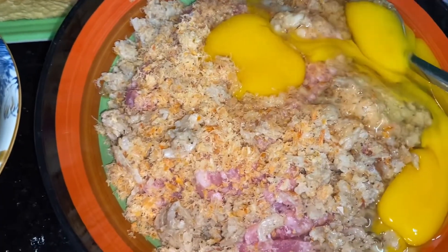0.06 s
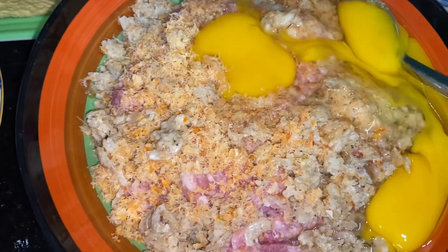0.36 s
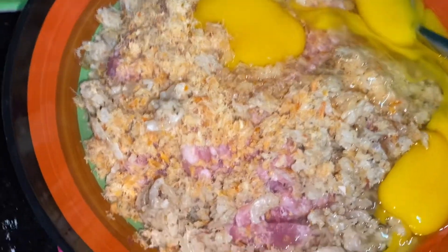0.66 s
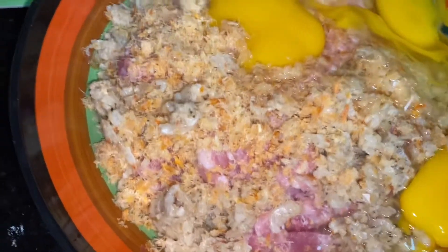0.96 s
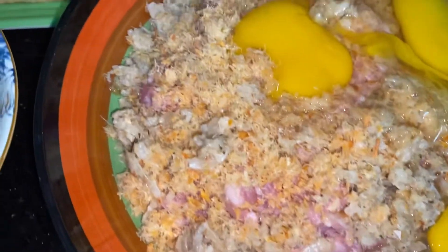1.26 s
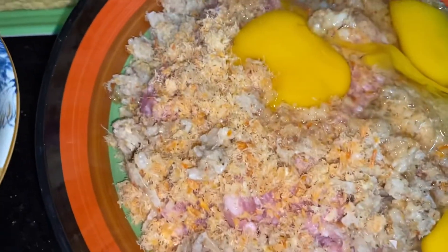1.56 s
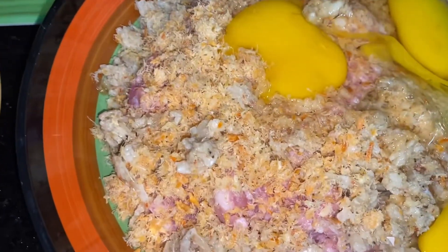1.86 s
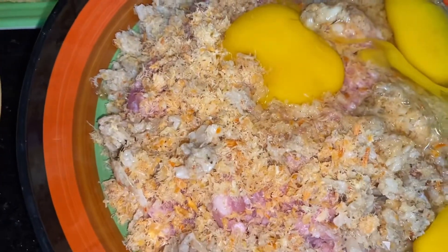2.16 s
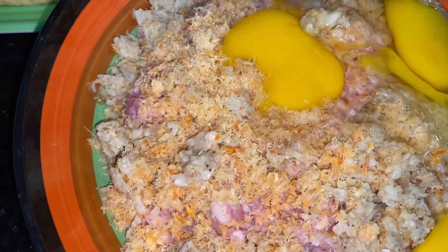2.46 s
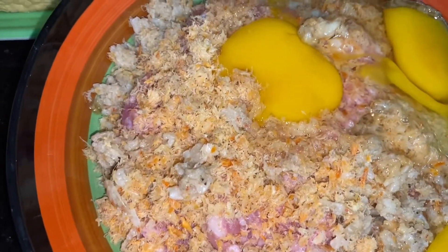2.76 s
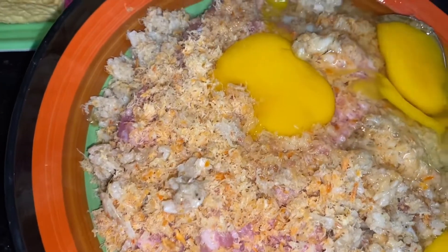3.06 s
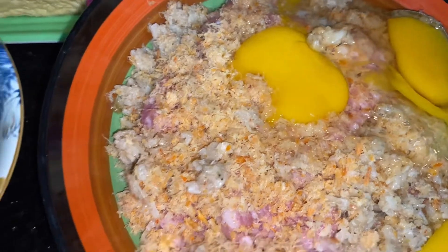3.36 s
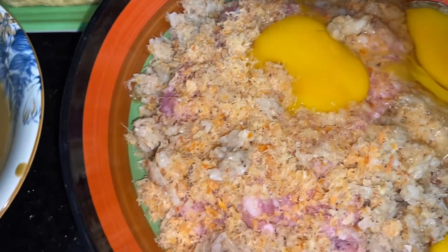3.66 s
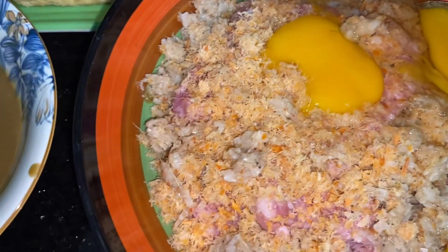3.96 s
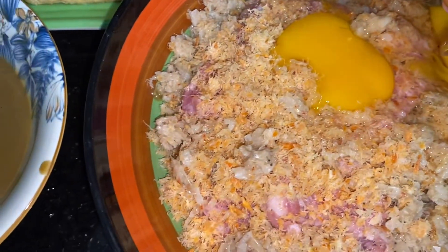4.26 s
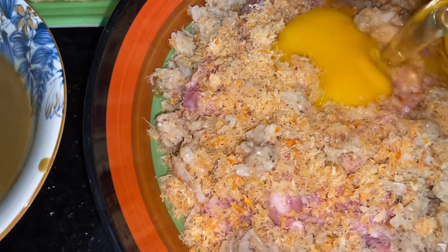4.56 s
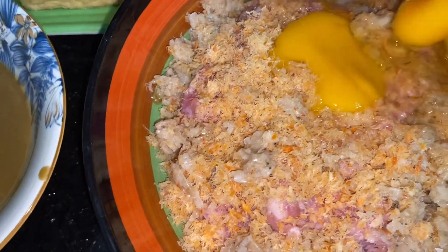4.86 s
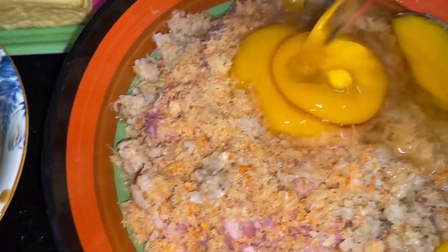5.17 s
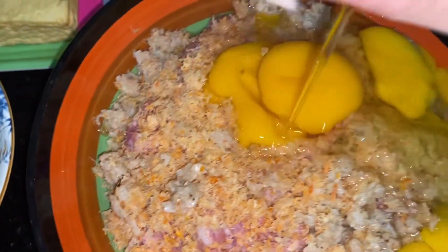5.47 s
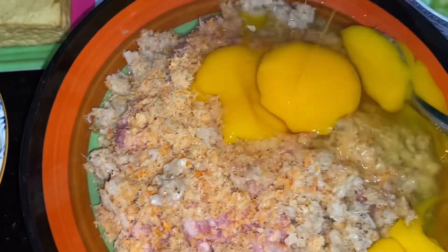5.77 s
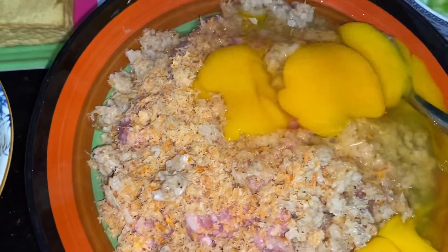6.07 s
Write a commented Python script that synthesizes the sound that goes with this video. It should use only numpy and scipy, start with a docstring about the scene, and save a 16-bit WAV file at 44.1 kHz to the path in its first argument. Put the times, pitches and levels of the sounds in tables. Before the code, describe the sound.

Eggs tap and crack against a china bowl with a ringing clink, then the shell crackles as it is pried open.

```python
"""Cracking eggs in a small kitchen

Eggs are cracked close by, over a dish of minced meat. Things knock and bounce on the counter in
heavily damped impacts. An egg taps a china bowl and breaks on its rim, exciting the modes of the
bowl and of a neighbouring dish. Thumbs pry the shell open in many brittle fractures that ring its
hollow. The walls return a diffuse reverberation, over room air and a low appliance hum."""
import sys
import numpy as np
from scipy import signal
from scipy.fft import rfft, irfft, next_fast_len
from scipy.io import wavfile
from scipy.ndimage import uniform_filter1d

SR = 44100
rng = np.random.default_rng(int(sys.argv[2]) if len(sys.argv) > 2 else 0)


def materialize(psi):
    """Save the field psi as 16-bit PCM at rate SR to the path in sys.argv[1].

    A 1-D psi becomes a single channel; in a 2-D psi each row is a channel.
    """
    bounded = np.clip(np.atleast_2d(psi).T, -1, 1)
    quanta = np.round(bounded * 32767).astype(np.int16)
    wavfile.write(sys.argv[1], SR, quanta)


N = 274302
TOP_HZ = 16000  # upper band limit


def amp(db):
    """Amplitude ratio of a level in decibels."""
    return 10 ** (np.asarray(db) / 20)


def unit(x):
    """Normalisation to unit RMS."""
    return x / np.sqrt(np.mean(x ** 2) + 1e-20)


def with_energy(x, envelope):
    """Normalisation to the energy of the envelope."""
    return x * np.linalg.norm(envelope) / np.linalg.norm(x)


def at_time(curve, s):
    """Linear interpolation of (time, value) points."""
    return np.interp(s, *np.transpose(curve))


def at_hz(curve, hz):
    """Interpolation of (frequency, value) points on a logarithmic axis."""
    freqs, values = np.transpose(curve)
    return np.interp(np.log(hz + 1), np.log(freqs + 1), values)


def fade(t, t60):
    """Exponential decay, 60 dB down after t60."""
    return np.exp(-np.log(1000) * t / t60)


def rise(t, tau):
    """Exponential approach to 1 with time constant tau."""
    return 1 - np.exp(-t / tau)


def add(track, s, sound):
    """Superposition of a sound on the track at s seconds."""
    part = track[round(s * SR):][:len(sound)]
    part += sound[:len(part)]


def filtered(x, response):
    """Filtering by multiplication with a complex frequency response."""
    n = x.shape[-1]
    padded = next_fast_len(n + SR // 10)
    return irfft(rfft(x, padded) * response(np.fft.rfftfreq(padded, 1 / SR)), padded)[..., :n]


def band(x, low_hz, high_hz, order=2):
    """Causal band-pass: a high-pass and a low-pass in cascade."""
    edge = lambda hz, kind: signal.butter(order, min(hz, SR / 2 - 1), kind, fs=SR, output="sos")
    return signal.sosfilt(np.vstack([edge(low_hz, "high"), edge(high_hz, "low")]), x)


def coloured(x, spectrum, size=1024):
    """Minimum-phase filtering: folding the cepstrum makes the response causal."""
    cepstrum = irfft(np.log(amp(at_hz(spectrum, np.fft.rfftfreq(size, 1 / SR)))))
    fold = np.r_[1, np.full(size // 2 - 1, 2), np.zeros(size // 2)]
    impulse_response = irfft(np.exp(rfft(cepstrum * fold)))
    return signal.fftconvolve(x, impulse_response)[:len(x)]


def resonance(x, hz, q):
    """Forced response of a damped resonator."""
    return signal.lfilter(*signal.iirpeak(min(hz, SR / 3), q, fs=SR), x)


def ring(modes, t, blur):
    """Free decay of (Hz, dB, t60) modes; phase diffusion widens each by the fraction blur."""
    wander = lambda hz: np.cumsum(rng.standard_normal(len(t))) * np.sqrt(2 * np.pi * blur * hz / SR)
    return sum(amp(db) * fade(t, t60) * np.sin(2 * np.pi * hz * t + wander(hz)) for hz, db, t60 in modes)


def burst(envelope):
    """Many tiny contacts sum to Gaussian noise under the envelope."""
    return envelope * rng.standard_normal(len(envelope))


def clumps(t, samples, spread_db=4.5):
    """Log-normal amplitude modulation gathers noise into gritty clumps."""
    return amp(spread_db * unit(uniform_filter1d(rng.standard_normal(len(t)), size=samples)))


# Spectrum of the room air: (frequency [Hz], relative density [dB])
AIR_SPECTRUM = [(20, -44.5), (38, -11.5), (55, 5), (78, 3), (100, -3.5), (130, 3), (190, -9), (290, -7),
                (450, -13.5), (1000, -19.5), (2500, -27.5), (5000, -30.5), (11000, -34.5), (16000, -38.5)]
# Partials of the appliance hum: (frequency [Hz], level [dB])
HUM_PARTIALS = [(124, -67), (284, -60.5), (660, -75.5)]


def background():
    """Partly coherent room noise, alike on both sides in the bass, and a hum of drifting phase."""
    side_gain_db = [(120, -25.5), (600, 1.0), (3000, -11.0), (7000, -43.5)]
    mid, side = filtered(rng.standard_normal((2, N)), lambda hz: amp(at_hz(AIR_SPECTRUM, hz)))
    side = filtered(side, lambda hz: amp(at_hz(side_gain_db, hz)))
    air = amp(-53) * unit(np.array([mid + side, mid - side]))
    t = np.arange(N) / SR
    drift = lambda: 4 * np.cumsum(rng.standard_normal(N)) / np.sqrt(SR)
    return air + sum(amp(db) * np.sin(2 * np.pi * hz * t + drift()) for hz, db in HUM_PARTIALS)


def whine(start=5.55, hz=658, db=-60):
    """A lightly damped mode sets in as a faint, almost steady tone."""
    out, t = np.zeros(N), np.arange(SR) / SR
    add(out, start, rise(t, 0.0085) * ring([(hz, db, 20)], t, blur=0.0048))
    return out


# Reverberation time of the kitchen: (frequency [Hz], t60 [s])
ROOM_DECAY = [(150, 0.33), (600, 0.74), (2200, 0.77), (5000, 0.68), (10000, 0.64), (16000, 0.2)]
# Reflection from the walls: (frequency [Hz], relative level [dB])
WALL_GAIN = [(100, 1.5), (500, -6.5), (2000, -5), (3700, -1.5), (6000, -2.5), (15000, -6.5)]


def reverberation(x, blur_octaves, size, side_db=-9.5):
    """Diffuse field: the room stores each band's energy and returns it as noise with blurred peaks."""
    hz, _, spectra = signal.stft(x, SR, nperseg=size)
    octave = np.log2(hz + 1)
    blur = np.exp(-.5 * ((octave[:, None] - octave) / blur_octaves) ** 2)
    power = blur / blur.sum(axis=1, keepdims=True) @ np.abs(spectra) ** 2
    kept = fade(size / 2 / SR, at_hz(ROOM_DECAY, hz)) ** 2  # share of energy left after one hop
    stored = np.abs([signal.lfilter([0, 1 - k], [1, -k], p) for k, p in zip(kept, power)])
    noise = signal.stft(rng.standard_normal((2, N)), nperseg=size)[2]
    wash = noise / noise.std() * np.sqrt(stored) * amp(at_hz(WALL_GAIN, hz))[:, None]
    mid, side = signal.istft(wash, nperseg=size)[1][:, :N]
    return np.array([mid + amp(side_db) * side, mid - amp(side_db) * side])


def scattering(x, db=-13, t60=0.0053, segments=24):
    """Time-varying scattering from moving hands and crockery makes the two sides differ."""
    side, t = np.zeros(N), np.arange(SR // 40) / SR
    for part in np.array_split(np.arange(N), segments):
        echoes = burst(fade(t, t60))
        add(side, part[0] / SR, signal.fftconvolve(x[part], echoes / np.linalg.norm(echoes)))
    return amp(db) * np.array([side, -side])


# Deep thuds: (time [s], level [dB], frequency [Hz], rise time [s], t60 [s])
DEEP_THUDS = [(2.698, -40, 75.5, .004, 0.23), (2.978, -24, 106.5, 0.005, 0.17),
              (3.013, -23.5, 70.8, 0.004, 0.13), (5.868, -30, 53, 0.07, 0.94)]


def thuds():
    """Damped low sinusoids swell and die away as round thuds."""
    out, t = np.zeros(N), np.arange(SR) / SR
    for s, db, hz, rise_s, t60 in DEEP_THUDS:
        add(out, s, amp(db) * rise(t, rise_s) * fade(t, t60) * np.sin(2 * np.pi * hz * t))
    return out


def click_gain(db):
    """Nonlinear contact: the harder the blow, the larger the share of its bright click."""
    return amp(-26.5 + 0.09 * db)


def knock(db, low_hz, high_hz, t60):
    """A heavily damped impact, strongest between two broad resonances of the thing struck."""
    t = np.arange(SR // 4) / SR
    envelope = fade(t, t60) * rise(t, 0.00035)
    clatter = burst(envelope)
    body = band(clatter, low_hz * 0.83, high_hz, order=3) + click_gain(db) * band(clatter, 2437, 13000)
    hollow = unit(resonance(body, low_hz, q=16)) + unit(resonance(body, high_hz, q=15))
    return amp(db) * with_energy(unit(body) + amp(-15.5) * hollow, envelope)


# Dull blows: (time [s], level [dB], lower resonance [Hz], upper resonance [Hz], t60 [s],
# settling bump relative to the blow [dB])
DULL_BLOWS = [(0.3151, -12, 1555, 2530, 0.039, -11), (0.3174, -5, 710, 1850, 0.013, -21),
              (2.6923, -23.5, 313, 730, 0.096, -25.5), (2.977, -5, 1000, 1390, 0.0054, -26.5),
              (2.9814, -6.5, 1020, 1400, 0.0074, -14.5), (3.007, -15, 835, 1450, 0.05, -26),
              (3.021, -24, 147, 1250, 0.034, -3.5), (3.074, -32.5, 890, 1522, 0.066, -27.5),
              (4.008, -14.5, 271, 1190, 0.0064, -14), (4.2, -21, 272, 1470, 0.015, -11.5)]


def knocks(settle_s=0.0046, pitch_ratio=0.35, decay_ratio=1.95):
    """Rebound: after each blow the thing settles with a lower, longer bump."""
    out = np.zeros(N)
    for s, db, low_hz, high_hz, t60, settle_db in DULL_BLOWS:
        add(out, s, knock(db, low_hz, high_hz, t60))
        bump = knock(db + settle_db, low_hz * pitch_ratio, high_hz * pitch_ratio, t60 * decay_ratio)
        add(out, s + settle_s, bump)
    return out


# Fingers rubbing on shell: (time [s], duration [s], level [dB], band centre [Hz])
RUB_STROKES = [(0.207, 0.062, -37.5, 5170), (0.223, 0.11, -43, 990), (0.371, 0.0055, -34, 10500),
               (1.467, 0.081, -53, 2560), (1.541, 0.059, -43.5, 2860), (1.574, 0.04, -34, 4200),
               (1.685, 0.024, -35.5, 810), (1.886, 0.069, -55.5, 8600), (1.965, 0.067, -44.5, 1110),
               (2.115, 0.029, -51.5, 4460), (3.161, 0.012, -48.5, 6100), (4.562, 0.083, -45, 3504),
               (4.713, 0.034, -39.5, 3400), (5.244, 0.038, -38.5, 9800), (5.322, 0.014, -25.5, 11900)]


def rubs():
    """Friction noise: a gritty band that swells and stops with the stroke."""
    out, t = np.zeros(N), np.arange(SR // 5) / SR
    for s, length, db, hz in RUB_STROKES:
        stroke = np.sqrt(np.abs(np.sin(np.pi * np.minimum(t / length, 1))))
        friction = band(burst(clumps(t, samples=60)), hz / 1.56, hz * 1.36)
        add(out, s, amp(db) * stroke * unit(friction))
    return out


# Taps as an egg is handled: (time [s], level [dB], contact corner [Hz], contact t60 [s])
EGG_TAPS = [(1.596, -8.5, 3180, 0.032), (1.714, -22.5, 1388, 0.072), (1.723, -27.5, 683, 0.13),
            (1.842, -17.5, 1500, 0.029), (1.849, -23.5, 1134, 0.076), (1.926, -31.5, 2460, 0.082),
            (2.091, -27.5, 1330, 0.027), (2.253, -35, 1120, 0.083), (2.778, -41.5, 1210, .04),
            (5.302, -29.5, 1430, 0.023)]
# Modes of a tap at the reference corner: (frequency [Hz], relative level [dB], t60 [s])
BODY_MODES = [(282.6, -15, 0.069), (500, -5.5, 0.047), (730, -3, 0.069), (930, 0, 0.042),
              (1400, -6.5, 0.066), (1661, 1, 0.011), (2230, -9.5, 0.064), (2864, -11.5, 0.054)]


def taps(reference_hz=1500):
    """Contact stiffness: a firmer tap raises a hollow body's modes and excites the upper ones more."""
    out, t = np.zeros(N), np.arange(SR // 4) / SR
    for s, db, corner_hz, t60 in EGG_TAPS:
        onset = rise(t, 0.0011)
        envelope = onset * fade(t, t60)
        clatter = burst(envelope)
        firmness = (corner_hz / reference_hz) ** .22
        contact = band(clatter, 420 * firmness ** 2, corner_hz, order=3)
        contact += click_gain(db) * band(clatter, 4800, 7800)
        modes = [(hz * firmness, level, life) for hz, level, life in BODY_MODES]
        hollow = band(onset * ring(modes, t, blur=0.053), 260 * firmness ** 2, corner_hz)
        add(out, s, amp(db) * with_energy(unit(hollow) + amp(-1.5) * unit(contact), envelope))
    return out


# Modes of the neighbouring dish: (frequency [Hz], relative level [dB], t60 [s], beat rate [Hz])
DISH_MODES = [(1346, -16, .6, 0), (1798, -10, 0.55, 0), (2412, -15, .8, 0), (3505, -14, .6, 17),
              (3874, 4, .23, 0), (2058, -7.5, 1.1, 2.6), (4344, -18, .85, 0)]


def dish(start=2.995, db=-29):
    """Free vibration: jolted by the hard blow, a dish sings on, and its close mode pairs beat."""
    out, t = np.zeros(N), np.arange(SR) / SR
    song = sum(np.cos(np.pi * beat * t) * ring([mode], t, blur=0.00045) for *mode, beat in DISH_MODES)
    add(out, start, amp(db) * song * rise(t, 0.0033))
    return out


# Blows of the egg on the bowl: (time [s], relative level [dB], contact corner [Hz])
BOWL_STRIKES = [(2.694, -11.5, 900), (2.700, -25, 9000), (2.9775, -7.5, 17130), (2.994, -18.5, 12000)]
# Modes of the filled china bowl: (frequency [Hz], relative level [dB], t60 [s])
BOWL_MODES = [(677, -12, 0.37), (734, -11, .3), (1457, -4, 0.16), (2331, 2, 0.068), (3490, 5, 0.086),
              (4770, -12, 0.25), (5760, -8.5, 0.047), (6150, -5.5, 0.14), (8700, -3.5, 0.049),
              (11050, -5, 0.066), (15500, -8, 0.061)]


def bowl():
    """Modal ringing, low-passed by the contact: a soft blow excites mainly the lowest modes."""
    out, t = np.zeros(N), np.arange(SR) / SR
    for s, db, corner_hz in BOWL_STRIKES:
        clink = ring(BOWL_MODES, t, blur=.008) * rise(t, 0.00027)  # the egg's loose contact blurs it
        add(out, s, amp(db - 10.5) * band(clink, 140, corner_hz))
    return out


# Pitch of the shell's hollow, which climbs during prying, drops as it opens and rises again
# once empty: (time [s], frequency [Hz])
CAVITY_PITCH = [(.32, 1230), (2.7, 670), (2.98, 1366), (4.42, 1250), (4.6, 1690), (4.685, 2270),
                (4.71, 792), (5.13, 816), (5.26, 943), (5.31, 1456), (5.7, 1923), (6.05, 1850)]
# Touches on the emptied halves: (time [s], relative level [dB])
SHELL_TICKS = [(5.314, -18), (5.325, -15.5), (5.546, -32.5), (5.686, -39.5), (5.83, -37), (5.852, -33),
               (5.904, -38.5), (6.068, -44)]


def ticks():
    """Damped modes of an empty half shell; a harder touch excites the top one more."""
    out, t = np.zeros(N), np.arange(SR // 10) / SR
    for s, db in SHELL_TICKS:
        hz = at_time(CAVITY_PITCH, s)
        modes = [(hz, 0, .038), (hz * 1.3, -4, .03), (hz * 2.56, 0.26 * db - 0.5, .025)]
        tick = rise(t, 0.00033) * ring(modes, t, blur=.028)  # the fingers widen the modes
        add(out, s, amp(db) * band(tick, 0.85 * hz, TOP_HZ, order=3))
    return out


# Spectrum of cracking eggshell: (frequency [Hz], relative density [dB])
CRACK_SPECTRUM = [(400, -30.5), (1200, -14.5), (2600, -4), (4200, -6), (5600, 2.5), (7500, -5.5),
                  (10000, -1), (13000, -9.5), (16000, -6.5)]
# The shell's own modes: (median frequency [Hz], relative level [dB])
SHELL_MODES = [(4700, -7), (5900, -2)]


def fracture(db, t60, hollow_db, hollow_hz, steps=3, run_s=.0026):
    """Brittle fracture: a crack runs in jumps, crumbles, and rings shards, shell and hollow."""
    t = np.arange(SR // 12) / SR
    jumps = (np.arange(steps) + rng.random(steps)) * run_s / steps
    ages = np.maximum(t - (jumps - jumps[0])[:, None], 0)
    envelope = rng.uniform(0.38, 1, steps) @ (fade(ages, t60) * rise(ages, 0.00016))
    crumble = unit(clumps(t, samples=48) * burst(fade(t, 6 * t60) * rise(t, .005)))
    crack = unit(coloured(unit(burst(envelope)) + amp(-12) * crumble, CRACK_SPECTRUM))
    shards = sum(resonance(crack, hz, q=hz / 110) for hz in rng.uniform(2400, 14000, 3))
    crack = with_energy(crack + amp(-7) * unit(shards), envelope)
    # the grip detunes the shell a little from snap to snap
    modes = [(hz * np.exp(0.14 * rng.standard_normal()), level - 10, .022) for hz, level in SHELL_MODES]
    shell = ring(modes, t, blur=0.0035)
    wall = with_energy(band(burst(fade(t, 0.047)), 460, 2200), fade(t, 0.0076))
    cavity = ring([(hollow_hz, 2.5, 25 / hollow_hz)], t, blur=0.02)  # lasts some 25 cycles
    hollow = amp(1) * wall + cavity * rise(t, 0.000097)
    return amp(db - 4) * (crack + shell + amp(hollow_db - 7) * hollow)


# Strength of the crackle as the thumbs pry: (time [s], relative level [dB])
PRYING_LEVEL = [(4.27, -41), (4.72, -35), (4.79, -44), (5.2, -40)]


def crackle(per_s=30, spread_db=8):
    """Acoustic emission: small fractures at uneven times, louder the harder the thumbs pull."""
    out = np.zeros(N)
    slots = np.arange(PRYING_LEVEL[0][0], PRYING_LEVEL[-1][0], 1 / per_s)
    for slot, (late, size, grip_octaves) in zip(slots, rng.random((len(slots), 3)) - .5):
        s = slot + late / per_s
        db = at_time(PRYING_LEVEL, s) + spread_db * size
        hz = at_time(CAVITY_PITCH, s) * 2 ** grip_octaves  # the shifting grip detunes the hollow
        add(out, s, fracture(db, t60=0.004, hollow_db=-23, hollow_hz=hz))
    return out


# Snaps of the shell: (time [s], relative level [dB], relative level of the hollow [dB])
SHELL_SNAPS = [(0.099, -30, -31), (0.2117, -29.5, 3), (0.2346, -18.5, -15), (0.315, -5.5, -6.5),
               (0.33, -13, -4), (1.927, -30, -20), (2.6922, -18.5, -5.5), (2.6983, -16.5, -8.5),
               (2.977, 0.5, -2.5), (2.9925, -8, -20), (3.7752, -33, -11), (3.8581, -23.5, -17.5),
               (3.995, -22.5, -19.5), (4.0087, -13, -8.5), (4.1985, -9.5, -40), (4.3209, -24, -15.5),
               (4.3702, -15, -10.5), (4.3802, -15, -16), (4.394, -20, -8), (4.41, -23, -7),
               (4.427, -17.5, -8.5), (4.4364, -20, -5.5), (4.4537, -26.5, -10), (4.544, -27, -11),
               (4.587, -15, -11), (4.592, -10.5, -7.5), (4.609, -23, -11), (4.6245, -19, 2.5),
               (4.6858, -15.5, -0.5), (4.7031, -15.5, -4.5), (4.711, -9.5, -9.5), (4.7186, -16, -9),
               (4.7302, -15, 2), (4.7503, -16.5, -8), (4.8464, -21, -9), (4.88, -31, -15),
               (4.897, -25, -3.5), (4.983, -29.5, -6), (5.012, -24.5, -13.5), (5.0373, -21, -20),
               (5.0887, -23.5, -5.5), (5.1004, -28, 5), (5.1211, -28.5, 5), (5.1303, -21.5, -11),
               (5.254, -29, 7.5), (5.2661, -34.5, 13), (5.2846, -24.5, -25), (5.3084, -21.5, -31),
               (5.3267, -26, -24), (5.351, -27, -5), (5.548, -21.5, -25.5), (5.8742, -26.5, -12.5),
               (6.005, -25, -2)]


def snaps(t60=0.0045):
    """Impulse excitation: each big fracture rings the hollow at its pitch of the moment."""
    out = np.zeros(N)
    for s, db, hollow_db in SHELL_SNAPS:
        add(out, s, fracture(db, t60, hollow_db, at_time(CAVITY_PITCH, s)))
    return out


def scene():
    """Superposition of the direct sound, its scattering, the reverberation and the background."""
    blows = knocks() + taps()
    shell = snaps() + ticks() + crackle() + rubs()
    clinks, song = bowl(), dish()
    wash = reverberation(amp(-9.5) * blows + amp(-15) * shell, blur_octaves=.25, size=256)
    afterglow = reverberation(amp(-12) * clinks + amp(-21) * song, blur_octaves=.008, size=1024)
    direct = blows + shell + clinks + song
    return direct + scattering(direct) + thuds() + whine() + wash + afterglow + background()


# Phase difference of the channels: (frequency [Hz], lead of the left [half turns])
PHASE_LEAD = [(0, 0), (300, 0), (600, -.2), (1200, 0), (2840, .22), (5000, .1), (7400, 1), (10400, 2),
              (13600, 3), (16200, 4)]
# Level difference of the channels: (frequency [Hz], left minus right [dB])
LEVEL_TILT = [(110, 0), (200, .7), (380, 2), (700, -3), (1290, -.7), (2380, -2.6), (4400, -.6), (8120, 0)]


def record(dry, ceiling=.85):
    """Artificial stereo widening by phase and level differences, with softened peaks and a band limit."""
    half = np.array([[.5], [-.5]])  # each channel takes half the difference
    gain = lambda hz: amp(half * at_hz(LEVEL_TILT, hz))
    phase = lambda hz: np.pi * half * np.interp(hz, *np.transpose(PHASE_LEAD))
    stereo = filtered(dry, lambda hz: gain(hz) * np.exp(1j * phase(hz)))
    rounded = stereo / (1 + np.abs(stereo / ceiling) ** 6) ** (1 / 6)
    return filtered(rounded, lambda hz: 1 / (1 + (hz / TOP_HZ) ** 80))


dry = scene()
out = record(dry)
materialize(out)
```